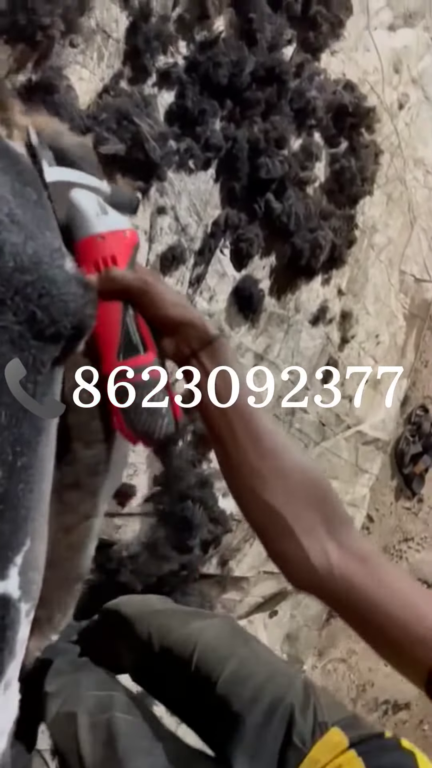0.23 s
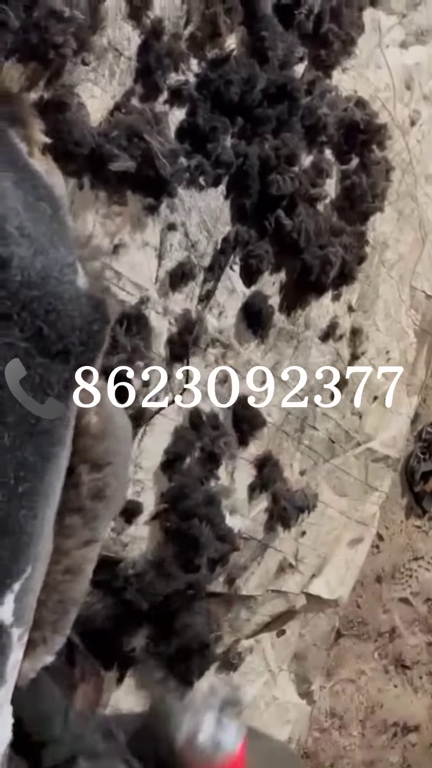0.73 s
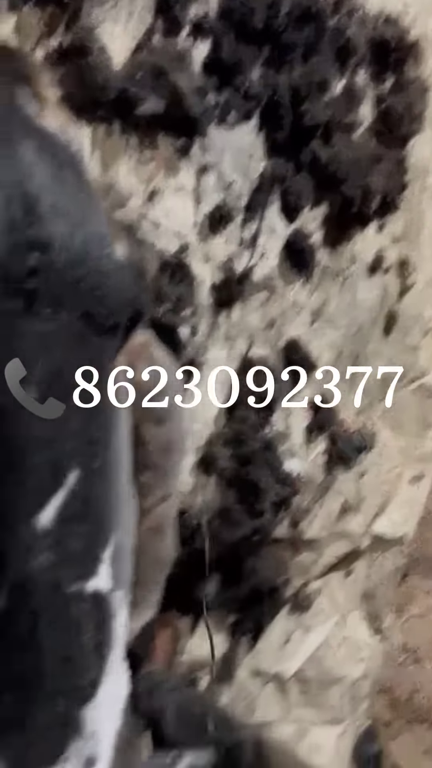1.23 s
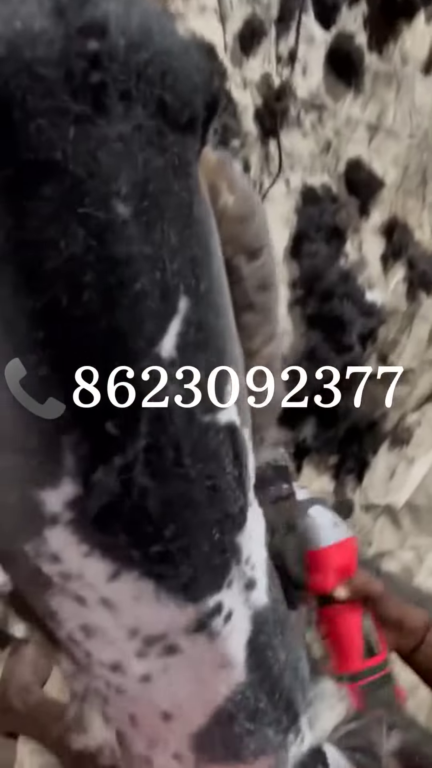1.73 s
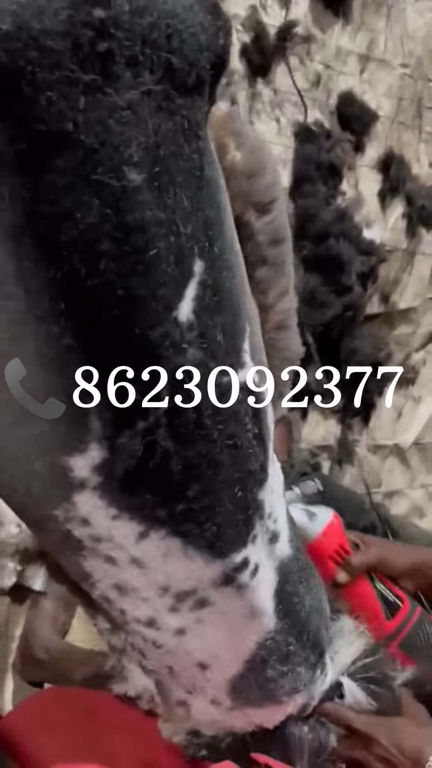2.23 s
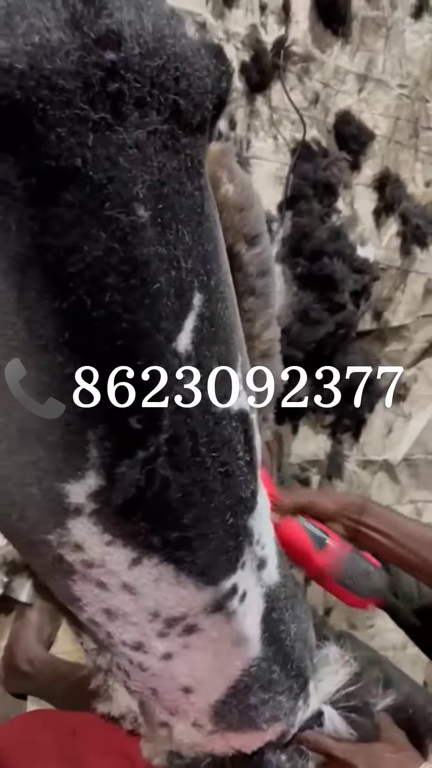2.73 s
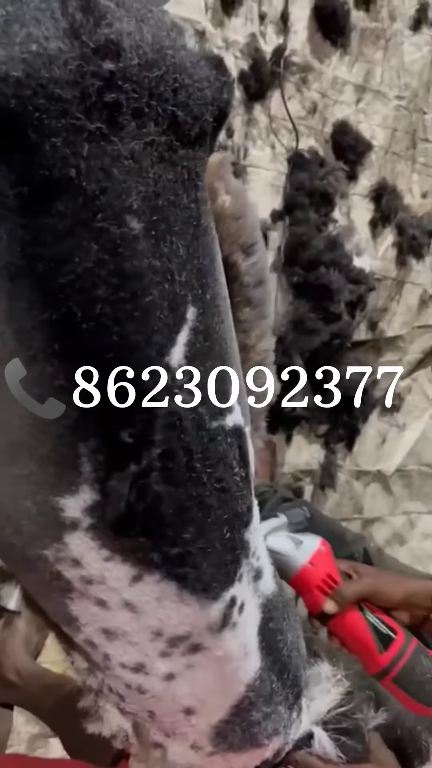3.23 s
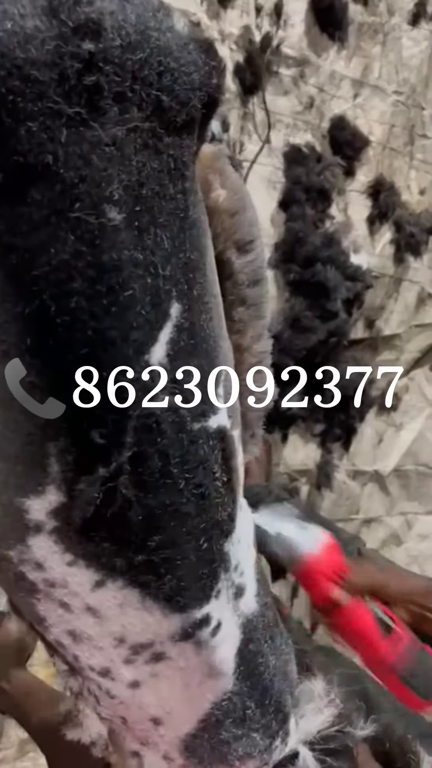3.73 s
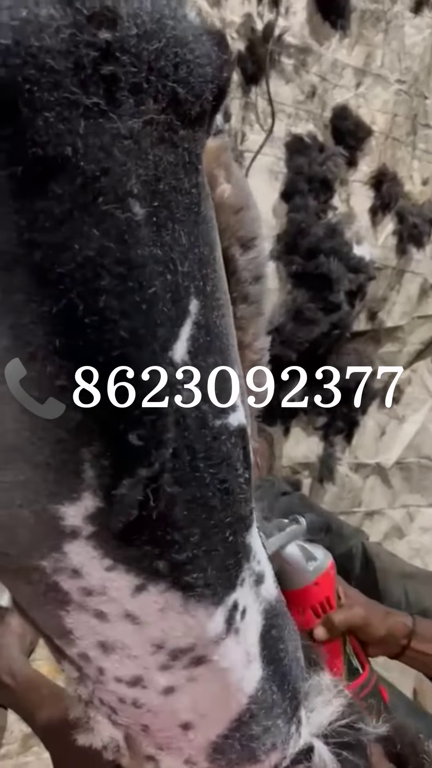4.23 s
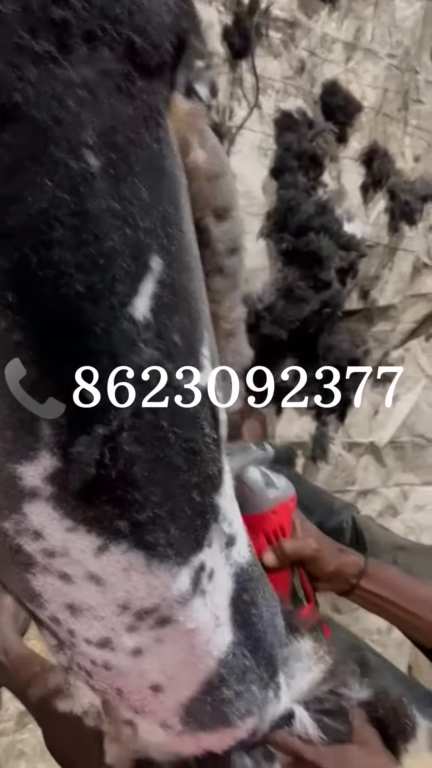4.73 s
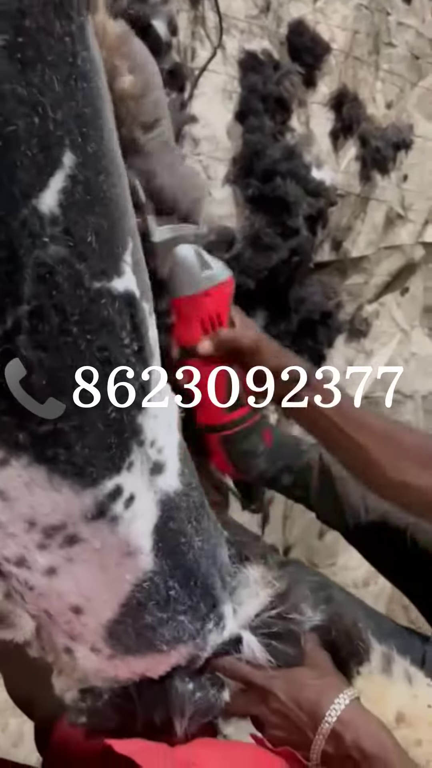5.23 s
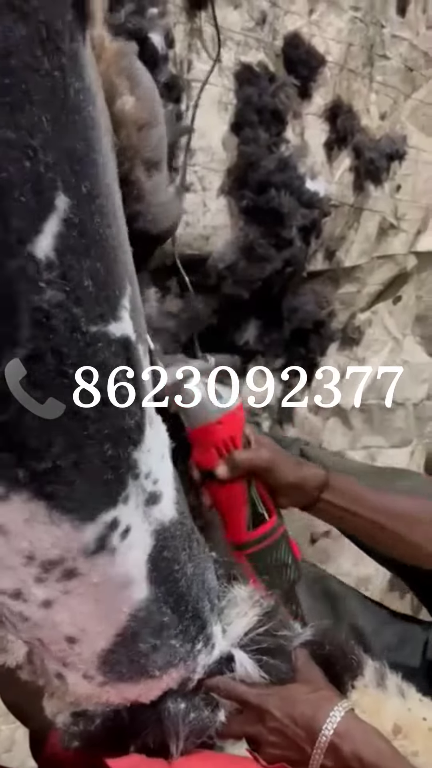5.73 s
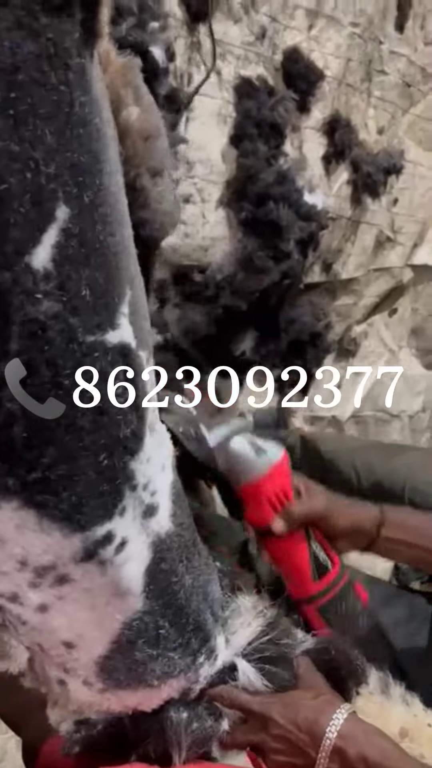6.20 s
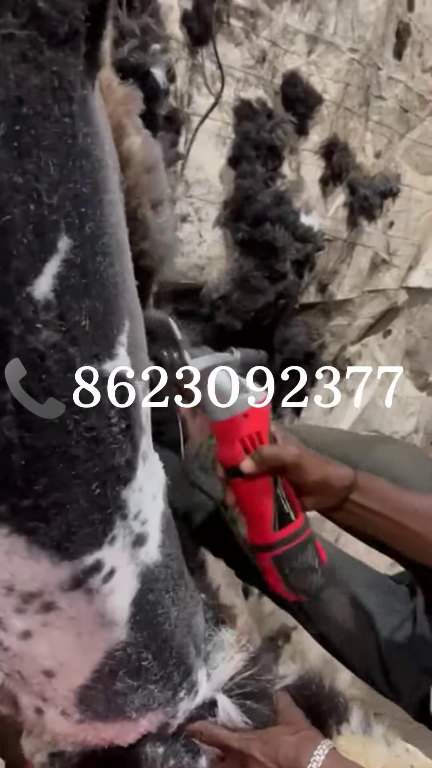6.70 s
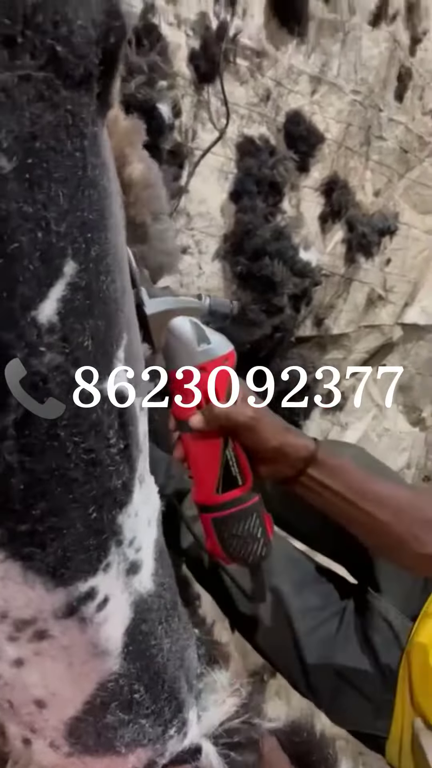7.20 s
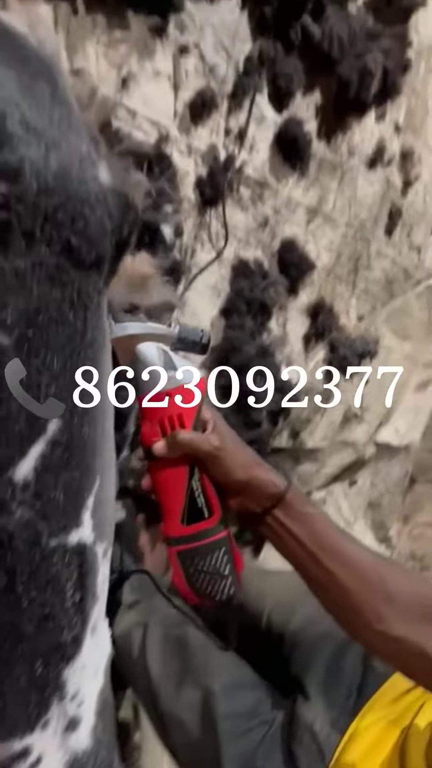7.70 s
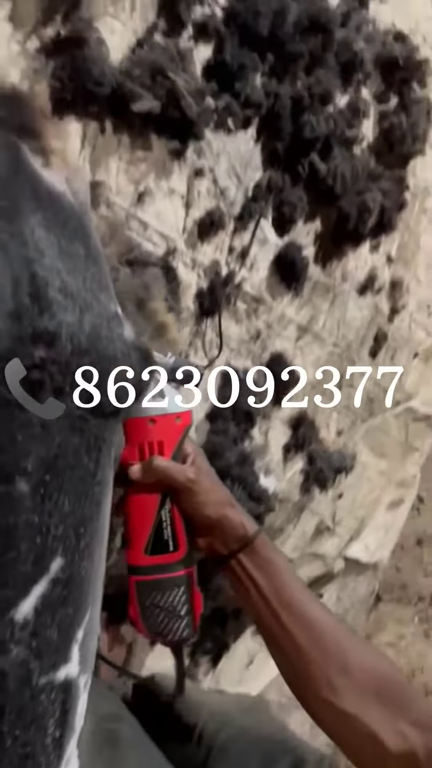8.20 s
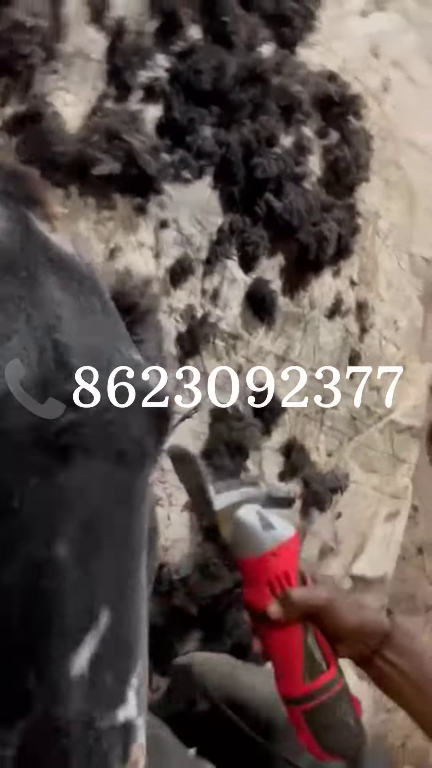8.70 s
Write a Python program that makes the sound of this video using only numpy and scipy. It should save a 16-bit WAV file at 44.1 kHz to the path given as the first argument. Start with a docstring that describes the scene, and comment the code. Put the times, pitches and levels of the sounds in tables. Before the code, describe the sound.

Close phone capture of mains-powered shears working over an animal in the open. Rapid cutter strokes blend into a gritty buzz, with a high wavering metal whine, scraping, vent whistle and broad hiss. The middle is thinner and airier; then pressure brings stronger ringing and hollow growls, and late strokes add heavy rattling. Low outdoor rumble stays faint behind, with the treble slightly dulled.

```python
"""A mains-powered sheep clipper shears an animal outdoors, an arm's length from a phone.
A reduction gear swings the cutter about 63 times a second; each stroke knocks the head and rings the steel comb.
The comb scrapes, whines in step with the motor and squeals; loose chatter and housing growls come and go.
Motor and gear tones follow a speed that sags under load; vents whistle, and filtered noise makes the hiss of
cooling air and cut fleece over a low outdoor rumble."""
import sys
import numpy as np
from scipy import signal
from scipy.fft import rfft, irfft, next_fast_len
from scipy.io import wavfile
from scipy.ndimage import uniform_filter1d

SR = 44100
rng = np.random.default_rng(int(sys.argv[2]) if len(sys.argv) > 2 else 0)


def dump_mix(stems):
    """Bounce the given channels to the path in sys.argv[1] as a 16-bit WAV at rate SR."""
    frames = np.atleast_2d(stems).T  # one column per channel
    limited = np.clip(frames, -1, 1)  # hard clip at full scale
    pcm = np.round(limited * 32767).astype(np.int16)
    wavfile.write(sys.argv[1], SR, pcm)


N = 394694
TIME = np.arange(N) / SR

# gear ratio, and blur of the high tones from an unevenly running rotor (turns)
TURNS_PER_STROKE, ROTOR_JITTER = 5.7437, 0.0045
# share of the scraping's power that comes back alike with every wheel turn
RATTLE_REPEAT = 0.42
# cutter contacts within a stroke: position [0-1], nominal length [strokes],
# relative push on the head [level/dB], relative push on the comb [level/dB]
CONTACT_POINTS = [(0.76, 0.11, -5.5, -9), (0.05, 0.084, -7.5, -5.5), (0.33, 0.1, -13, -4)]
HEAD_PUSH_DB = [row[2] for row in CONTACT_POINTS]
COMB_PUSH_DB = [row[3] for row in CONTACT_POINTS]


def undb(db):
    """Turn dB into a gain."""
    return 10 ** (np.asarray(db) / 20)


def unit(x):
    """Scale to rms 1."""
    return x / np.sqrt(np.mean(x ** 2))


def curves(table):
    """The columns of a table, joined by straight lines in time."""
    t, *columns = np.transpose(table)
    return [np.interp(TIME, t, column) for column in columns]


def bumps(table):
    """Sum of smooth swells, one per row: centre [t/s], half length to 1/e [t/s], height."""
    out = np.zeros(N)
    for centre, length, height in table:
        near = np.abs(TIME - centre) < 4 * length
        out[near] += height * np.exp(-((TIME[near] - centre) / length) ** 2)
    return out


def spells(table):
    """Gain of passing sounds whose peak levels are in dB, silent in between."""
    return bumps([(centre, length, undb(db)) for centre, length, db in table])


def colour(x, points, power=1):
    """Filter by a spectrum of (f/Hz, level/dB) points, with the dB scaled by power."""
    size = next_fast_len(N, True)
    hz, db = np.transpose(points)
    bins = np.maximum(np.fft.rfftfreq(size, 1 / SR), 1)
    gain = undb(power * np.interp(np.log(bins), np.log(hz), db))
    return irfft(rfft(x, size) * gain, size)[..., :N]


def resonate(pair, hz, width):
    """A steep-sided resonance on a mid and side pair: two passes, each of this width."""
    b, a = signal.iirpeak(hz, hz / width, fs=SR)
    once = signal.lfilter(b, a, pair)
    return signal.lfilter(b, a, once)


def swept(pair, hz, width):
    """A resonance whose centre moves from sample to sample: shift to zero, low-pass, shift back."""
    carrier = np.exp(2j * np.pi * np.cumsum(hz) / SR)
    b, a = signal.butter(2, width / 2, fs=SR)
    return np.real(signal.lfilter(b, a, pair / carrier) * carrier)


def walk(rate):
    """Smooth random drift, spread near 1, from rate random points per second."""
    knots = rng.standard_normal(2048)
    path = np.interp(TIME * rate, np.arange(len(knots)), knots)
    return 1.35 * uniform_filter1d(path, max(int(SR / rate), 1))


def noise():
    """Unrelated mid and side noise."""
    return rng.standard_normal((2, N))


def tone(cycles, waver_db, drift):
    """A mid and side tone whose level and phase wander as the hand moves."""
    phase = 2 * np.pi * cycles + drift * walk(4)
    gain = np.sqrt(2) * undb(waver_db * walk(5))
    mid = np.sin(phase)
    side = walk(2.03) * np.cos(phase + 0.48 * walk(2.97))
    return gain * np.array([mid, side])


def contact_force(strokes, push_db, slide, scatter_db, jitter):
    """Sliding friction plus the knocks of each stroke: a quick rise, a slower fall, no two quite alike."""
    power = slide ** 2
    for (at, length, *_), db in zip(CONTACT_POINTS, push_db):
        since = strokes - at + 2
        index = np.round(since).astype(int)
        size, late = np.clip(rng.standard_normal((1024, 2)), -2, 2)[index].T
        lag = since - index - jitter * late
        spread = length * (1 + .5 * np.sign(lag))
        shape = np.exp(-.5 * (lag / spread) ** 2)
        # the hand shifts the pressure from one contact to another
        level_db = db + scatter_db * size + 1.0 * walk(3.11)
        power = power + (undb(level_db) * shape) ** 2
    # even out the level over an eighth of a second
    return np.sqrt(power / uniform_filter1d(power, SR // 8))


def scrape(strokes, repeat, grain_db):
    """Steel over steel: part of the roughness comes back with every wheel turn (two strokes), the rest is new."""
    size = int(2 * N / strokes[-1])
    track = signal.resample(rng.standard_normal((4, size)), 8 * size, axis=1)
    position = (strokes / 2 % 1 * track.shape[1]).astype(int)
    rough = track[:, position]
    # the repeating roughness changes as fleece passes through the teeth
    wear = walk(2.5)
    worn = np.cos(wear) * rough[:2] + np.sin(wear) * rough[2:]
    fresh = unit(noise() * undb(grain_db * rng.uniform(-0.78, 1, N)))
    repeat = np.clip(repeat, 0, 1)
    return np.sqrt(repeat) * worn + np.sqrt(1 - repeat) * fresh


def knock(strokes):
    """Where the cutter turns, the play in the drive closes at once and the shock dies away."""
    turn_at, decay = 0.69, 0.042  # strokes
    return np.exp(-((strokes - turn_at) % 1) / decay)


def drag(strokes):
    """Gain of the rattle over a stroke: strongest in mid-cut, slack on the way back."""
    strongest_at, swing_db = 0.9, 1.8
    return undb(swing_db * np.cos(2 * np.pi * (strokes - strongest_at)))


def taps(strokes, jitter, scatter_db):
    """One hard click each time the cutter strikes home, a little early or late."""
    clicks = np.zeros((2, N))
    number = np.arange(1, int(strokes[-1]) - 1)
    for at, _, db, _ in CONTACT_POINTS:
        late, size, side = rng.uniform(-1, 1, (len(number), 3)).T
        when = np.searchsorted(strokes, number + at - .04 + jitter * late).clip(0, N - 1)
        mid_side = np.array([np.ones(len(number)), 2 * side])
        clicks[:, when] += undb(db + scatter_db * size) * mid_side
    return unit(clicks)


def rumble():
    """Outdoor rumble: unrelated mid and side noise, filtered low."""
    # rumble level: t/s, level/dB
    level = [(0, -42.5), (2.3, -43.5), (3.6, -42.5), (5, -42.5), (7, -42), (8.95, -42)]
    # relative rumble spectrum: f/Hz, level/dB
    spectrum = [(20, -24), (35, -38), (50, 0), (110, 1), (200, -3.5), (300, -4.5), (400, 1), (600, -6),
                (1500, -30.5)]
    return undb(curves(level)[0]) * unit(colour(noise(), spectrum))


def hiss(strokes):
    """Cooling air rushes steadily; fibres snapping between the teeth add noise that pulses with each stroke."""
    # hiss in the open: t/s, level/dB
    level = [(0.0, -30), (0.7, -28.5), (1.2, -29.5), (3.4, -29.5), (3.9, -27), (4.5, -27.5), (6.5, -27.5),
             (8.95, -29)]
    # the head passes behind the animal, which shades the hiss: t/s, half length [t/s], depth [level/dB]
    shadows = [(0.4, 0.1, 2.5), (2.3, 0.33, 2), (2.7, 0.12, 7), (3.6, 0.089, 3.5), (5.28, 0.072, 2.5)]
    # relative colour of air and cut fleece: f/Hz, level/dB
    spectrum = [(600, -12), (1800, -4), (3100, 1.5), (4000, 3), (5100, 3), (5550, 2), (6300, 6),
                (6800, 2.5), (7400, 1.5), (8200, 3.5), (8650, 4), (9300, 2), (10800, 3.5), (12000, -23.5)]
    hiss_db = curves(level)[0] - bumps(shadows) + 1.0 * walk(11)
    force = contact_force(strokes, HEAD_PUSH_DB, slide=.3, scatter_db=.6, jitter=.02)
    rush = unit(noise() + force * scrape(strokes, repeat=0.2, grain_db=8.5))
    # the treble of the hiss flickers at random in four broad bands
    flicker = sum(.2 * walk(9) * resonate(rush, hz, 1500) for hz in (6300, 7400, 8700, 10200))
    return undb(hiss_db) * unit(colour(rush + flicker, spectrum))


def fan(turns):
    """The fan and the commutator whistle out of the vents, louder when these face the phone."""
    # vents swing towards the phone or away: t/s, half length [t/s], gain [level/dB]
    fan_swells = [(0.48, 0.12, 6), (0.94, 0.08, 10), (1.1, 0.06, -12), (1.35, 0.15, 3), (1.95, 0.17, 5.5),
                  (2.68, 0.12, -12), (2.88, 0.1, 5), (3.15, 0.12, 4.5), (3.35, 0.06, -9), (4.0, 0.12, 5),
                  (4.43, 0.1, 6.5), (5.2, 0.16, 11.5), (5.48, 0.06, -9), (5.8, 0.2, 3), (6.6, 0.25, -4),
                  (7.35, 0.25, 8), (7.8, 0.15, 4.5), (8.25, 0.22, 6), (8.72, 0.05, 7.5)]
    # the commutator's thin whine beams at the phone: t/s, half length [t/s], gain [level/dB]
    commutator_swells = [(0.52, 0.07, 13), (2.3, 0.08, 10), (3.2, 0.2, 10), (4.3, 0.14, 10),
                         (5.35, 0.25, 9), (6.3, 0.15, 8), (7.0, 0.35, 9), (8.72, 0.14, 14)]
    fan_order, commutator_order = 15, 24  # multiples of the motor speed
    fan_db, commutator_db = -45, -53  # before the swells
    uneven = turns + ROTOR_JITTER * walk(110)
    whistle = undb(fan_db + bumps(fan_swells)) * tone(fan_order * uneven, waver_db=1.2, drift=.4)
    thin_whine = tone(commutator_order * uneven, waver_db=0.5, drift=.5)
    return whistle + undb(commutator_db + bumps(commutator_swells)) * thin_whine


def motor(turns, strokes, speed_hz, housing_db):
    """Hum of the rotor, its overtones and the gear wheel's tones, all locked to the turning shaft."""
    # steady motor tones: multiple of the motor speed, level/dB
    motor_tones = [(4, -61), (5, -47), (6, -49), (7, -51.5), (10, -61), (11, -50), (13, -49), (14, -49.5),
                   (18, -52), (19, -51.5)]
    # gear wheel tones before strain: multiple of the wheel's speed, level/dB
    wheel_tones = [(9, -77), (13, -62.5), (20, -64), (23, -59.5), (28, -60), (54, -53), (56, -48.5),
                   (82, -54), (84, -45.5), (86, -52.5)]
    # wheel tones that stand out briefly: t/s, half length [t/s], multiple of the wheel's speed, level/dB
    wheel_swells = [(5.08, 0.2, 9, -50), (7.55, 0.3, 20, -48)]
    hum = undb(-45.5) * tone(turns, waver_db=2.0, drift=0.54)
    # a wheel tone just under the hum beats with it
    beat = undb(-52) * tone(11 * strokes / 2, waver_db=1.5, drift=.4)
    uneven = turns + ROTOR_JITTER * walk(110)
    overtones = sum(undb(db) * tone(k * uneven, waver_db=3, drift=0.53) for k, db in motor_tones)
    wheel_turns = uneven / TURNS_PER_STROKE / 2
    wheel = sum(undb(db) * tone(k * wheel_turns, waver_db=3.0, drift=0.69) for k, db in wheel_tones)
    # the gear grows louder as the fleece drags the motor down; the housing radiates it
    slowing_db = 0.24 * (np.median(speed_hz) - speed_hz)
    strain_db = slowing_db + 0.53 * (housing_db - np.median(housing_db))
    swells = sum(spells([(t, length, db)]) * tone(k * strokes / 2, waver_db=1.5, drift=0.35)
                 for t, length, k, db in wheel_swells)
    return hum + beat + overtones + undb(strain_db) * wheel + swells


def growl(strokes):
    """Pressed against the animal, the hollow housing growls at the rate of the strokes."""
    # growls: t/s, half length [t/s], level/dB
    growls = [(3.9, 0.48, -54), (5.01, 0.28, -40.5), (5.75, 0.26, -42), (6.203, 0.21, -42.5),
              (8.1, 0.53, -44.5)]
    force = contact_force(strokes, HEAD_PUSH_DB, slide=.2, scatter_db=2, jitter=.012)
    body = resonate(force * scrape(strokes, repeat=0.32, grain_db=8.0), hz=882, width=240)
    return spells(growls) * unit(body)


def chatter(strokes):
    """A loosely loaded cutter slaps the comb in clumps and rings the head's lowest resonance."""
    # spells of chatter: t/s, half length [t/s], level/dB
    chatters = [(0.165, 0.15, -29.5), (0.42, 0.08, -36), (2.354, 0.37, -34.5), (3.302, 0.37, -35.5),
                (4.21, 0.091, -35), (8.153, 0.32, -32.5), (8.47, 0.05, -33)]
    force = contact_force(strokes, COMB_PUSH_DB, slide=.05, scatter_db=2.5, jitter=.015)
    slaps = force * drag(strokes) * scrape(strokes, repeat=RATTLE_REPEAT, grain_db=13)
    centre_hz = 1830 * (1 + 0.017 * walk(6.7))
    return spells(chatters) * unit(swept(slaps, centre_hz, width=330))


def head(strokes, housing_db, rattle_db):
    """Scraping and hard taps rattle the metal head; scraping alone drives the plastic housing behind it."""
    # metal resonances: f/Hz, width per pass [f/Hz], relative level/dB
    head_modes = [(1744, 360, -1.5), (1986, 880, -2.5), (2606, 560, -1), (3340, 920, -3.5)]
    # relative colour of the plastic housing: f/Hz, level/dB
    housing_spectrum = [(90, -31), (250, -15.5), (420, -10.5), (600, -8), (860, -2), (1100, -5.5),
                        (1400, -1), (1900, -7), (3500, -17.5)]
    force = contact_force(strokes, HEAD_PUSH_DB, slide=0.48, scatter_db=3.0, jitter=0.01)
    force = force + 0.95 * knock(strokes)
    thuds = force * scrape(strokes, repeat=0.23, grain_db=8.0)
    rattle = unit(force * scrape(strokes, repeat=RATTLE_REPEAT, grain_db=6.0))
    drive = rattle + 0.28 * taps(strokes, jitter=.07, scatter_db=1.5)
    # the vibration reaches each part of the head 0.6 ms after the one before
    lag = int(0.0006 * SR)
    metal = sum(undb(db) * np.roll(resonate(drive, hz, width), lag * k, axis=1)
                for k, (hz, width, db) in enumerate(head_modes))
    housing = colour(thuds, housing_spectrum)
    return undb(rattle_db) * unit(drag(strokes) * metal) + undb(housing_db) * unit(housing)


def squeals(scraping):
    """As the comb lifts off or meets the fleece, its scraping flares up and may slide in pitch."""
    # squeals: t/s, length [t/s], pitch [f/Hz], glide [Hz/s], width [f/Hz], level/dB
    flares = [(0.5, 0.018, 4200, 1500, 260, -35), (0.568, 0.014, 4910, 9000, 450, -27),
              (0.71, 0.03, 4230, 2000, 300, -34), (0.785, 0.029, 4480, 2500, 650, -37),
              (1.235, 0.018, 4080, 0, 260, -34), (2.478, 0.077, 4070, -500, 150, -37),
              (3.0, 0.077, 4420, 0, 200, -40), (5.13, 0.099, 5000, 0, 500, -33),
              (5.72, 0.099, 4600, 0, 150, -37)]
    out = np.zeros((2, N))
    for t, length, hz, glide, width, db in flares:
        near = np.abs(TIME - t) < 4 * length
        since = TIME[near] - t
        flare = undb(db) * np.exp(-.5 * (since / length) ** 2)
        out[:, near] += flare * unit(swept(scraping[:, near], hz + glide * since, width))
    return out


def comb(turns, strokes, speed_hz):
    """The comb rings in bursts, fed by the scraping cutter and by a whine locked to the motor."""
    # the comb where it is free to ring: t/s, whine [level/dB], scraping ring [level/dB]
    free_ringing = [(0.0, -20.5, -26), (0.1, -28, -33), (0.78, -25.5, -31), (1.0, -31.5, -37),
                    (1.17, -29, -36), (2.0, -28, -36), (2.25, -30.5, -38), (2.72, -28, -38),
                    (3.0, -34.5, -38), (3.3, -37, -39.5), (3.65, -29.5, -38), (4.3, -30.5, -37.5),
                    (4.75, -28.5, -35), (5.05, -25.5, -28.5), (5.3, -24.5, -28), (5.6, -23.3, -29),
                    (5.85, -23.8, -29), (6.5, -26, -32.5), (7.05, -24, -31), (7.3, -28, -27.5),
                    (7.68, -25.8, -27), (8.1, -32.5, -30), (8.55, -27, -32), (8.95, -29, -34)]
    # bites into the fleece that damp the comb: t/s, half length [t/s], depth [level/dB]
    bites = [(0.37, 0.085, 8), (0.61, 0.045, 15), (0.915, 0.062, 19), (1.345, 0.055, 9), (1.77, 0.062, 22),
             (2.475, 0.1, 20), (2.85, 0.075, 14), (3.15, 0.05, 4), (3.51, 0.06, 9), (3.77, 0.028, 16),
             (5.46, 0.035, 5), (5.96, 0.05, 14), (6.15, 0.05, 9), (6.69, 0.065, 10), (8.0, 0.075, 9),
             (8.38, 0.051, 5.5), (8.64, 0.03, 21), (8.87, 0.055, 14)]
    # steel resonances before tuning: f/Hz, width [f/Hz], relative level/dB
    comb_modes = [(4124, 370, 3.5), (4463, 310, 0), (4900, 470, -5)]
    open_whine_db, open_ring_db = curves(free_ringing)
    # a freely ringing comb locks on to the whine, a damped one only scrapes
    damping_db = bumps(bites)
    whine_db = open_whine_db - damping_db
    ring_db = open_ring_db - 0.25 * damping_db
    force = contact_force(strokes, COMB_PUSH_DB, slide=0.07, scatter_db=1.7, jitter=0.0098)
    force = force + 2.2 * knock(strokes)
    scraping = force * scrape(strokes, repeat=RATTLE_REPEAT, grain_db=10.0)
    # the drag that slows the motor also lowers the comb's resonances
    tuning = speed_hz / np.median(speed_hz) * (1 + 0.012 * walk(9))
    ring = unit(sum(undb(db) * swept(scraping, hz * tuning, width) for hz, width, db in comb_modes))
    # the load peaks once a stroke: the whine swells, and its level flickers at random
    swing = 2 * np.pi * (strokes - .93)
    load = unit(force * (1 + 0.59 * np.cos(swing)) * undb(1.3 * walk(35)))
    # its pitch sways once a stroke and once per contact, and chatters at random (cycles)
    stroke_sway = np.sin(swing + 1.5 * walk(1))
    contact_sway = np.sin(len(CONTACT_POINTS) * swing + 1.5 * walk(3))
    flutter = 0.052 * (stroke_sway + contact_sway) + 0.045 * walk(130)
    # the whine sits at 12 times the motor speed
    whine = load * tone(12 * turns + flutter, waver_db=1.0, drift=0.23)
    return undb(ring_db) * ring + undb(whine_db) * whine + squeals(scraping)


def microphones(mid, side):
    """Two ports a phone's length apart: alike in the bass, different in colour and phase higher up."""
    # gain of the diffuse side signal: f/Hz, level/dB
    width = [(170, -55), (350, -13.5), (550, -5), (800, -6), (1100, -1.5), (1550, -16), (2000, -63),
             (2350, -27), (2650, -5.5), (3100, -11.5), (3800, -18.5), (4800, -9), (7000, -5.5),
             (11000, -5.5)]
    # colour difference, scaled for each port below: f/Hz, level/dB
    tilt_points = [(350, -0.3), (520, 3.5), (930, -6.5), (1300, -4.5), (1550, 0), (2300, -0.4),
                   (2600, -1.5), (3000, 0.3), (4900, 3.5), (6200, 0.5), (11000, 0)]
    # phase by which the left port leads: f/Hz, phase [rad]
    lead_points = [(500, -0.38), (720, -0.92), (950, -0.65), (1200, 0.05), (2350, 0), (2650, 0.42),
                   (3100, 0.03), (4100, 0), (4450, 0.3), (5000, -0.3), (7000, -0.65), (11000, -1.0)]
    mono_hz = 220  # no phase lead below this
    side = colour(side, width)
    size = next_fast_len(N, True)
    lead = np.interp(np.fft.rfftfreq(size, 1 / SR), *np.transpose([(mono_hz, 0), *lead_points]))
    tilt = [(mono_hz, 0), *tilt_points]
    left = colour(mid + side, tilt, 0.044)
    right = colour(mid - side, tilt, -0.91)
    turned = rfft([left, right], size) * np.exp(.5j * np.array([lead, -lead]))
    return irfft(turned, size)[:, :N]


def scene():
    """Motor speed times every moving part; the hand sets pressure and place."""
    # motor speed, sagging as the fleece drags on the cutter: t/s, turns per second [f/Hz]
    speed = [(0.0, 360.1), (0.26, 360.5), (0.62, 364.4), (0.78, 365.6), (1.22, 366.6), (1.32, 365.7),
             (1.64, 359.9), (1.96, 360.5), (2.2, 359.9), (2.36, 358.5), (2.62, 354.0), (3.04, 359.6),
             (3.38, 358.0), (3.6, 358.1), (3.88, 361.5), (4.18, 360.6), (4.76, 359.8), (4.88, 357.5),
             (4.96, 357.1), (5.1, 354.7), (5.22, 350.8), (5.28, 350.6), (5.52, 355.6), (5.68, 358.2),
             (6.06, 357.8), (6.28, 360.2), (6.42, 359.8), (6.88, 362.4), (7.18, 361.5), (7.54, 358.7),
             (8.38, 355.7), (8.6, 356.5), (8.7, 359.0), (8.94, 360.5)]
    # the clipper brought nearer and pressed: t/s, housing [level/dB], head rattle [level/dB]
    handling = [(0.0, -34, -28.5), (0.5, -35, -31.5), (1.0, -42.5, -32.5), (1.7, -38.5, -33),
                (2.8, -39.5, -35.5), (3.25, -37.5, -32), (4.25, -37.5, -35.5), (5.1, -36.5, -28),
                (5.55, -37.5, -31.5), (6.7, -36.5, -30), (7.3, -33.5, -29), (7.65, -34, -30.5),
                (8.05, -33, -27.5), (8.5, -35, -31), (8.75, -37.5, -33.5), (8.95, -35, -28.5)]
    # where the clipper is held: t/s, left minus right [level/dB]
    place = [(0.0, -1), (1.2, 0.7), (2.0, 0), (3.0, 0), (4.0, 0.5), (5.6, -0.9), (7.5, -1.1), (8.95, -0.5)]
    speed_hz = curves(speed)[0]
    turns = np.cumsum(speed_hz) / SR
    strokes = turns / TURNS_PER_STROKE
    housing_db, rattle_db = curves(handling)
    pan_db = curves(place)[0]
    # the hand never presses quite evenly
    tremor = walk(12)
    air = hiss(strokes) + fan(turns)
    cutting = head(strokes, housing_db + 0.68 * tremor, rattle_db + 1.22 * tremor)
    cutting = cutting + comb(turns, strokes, speed_hz) + chatter(strokes) + growl(strokes)
    clipper = motor(turns, strokes, speed_hz, housing_db) + cutting + air
    panned = microphones(*clipper) * undb(np.array([pan_db, -pan_db]) / 2)
    return panned + microphones(*rumble())


def record(dry):
    """The phone cuts the top with a steep low-pass."""
    top_hz = 11150
    low_pass = signal.ellip(10, .2, 80, top_hz, fs=SR, output="sos")
    return signal.sosfilt(low_pass, dry)


dry = scene()
out = record(dry)
dump_mix(out)
```